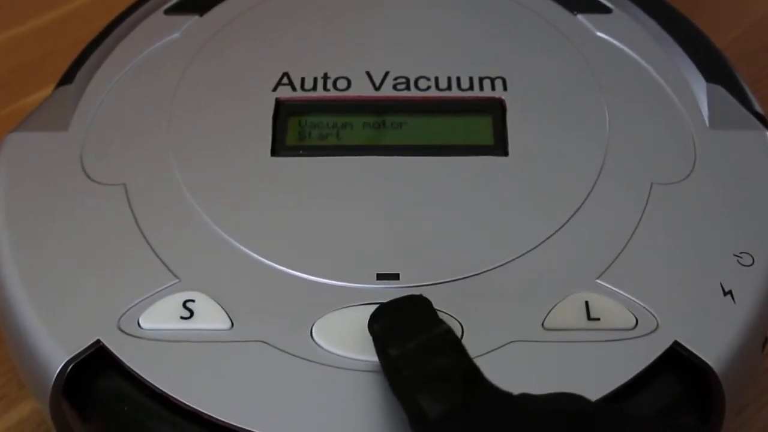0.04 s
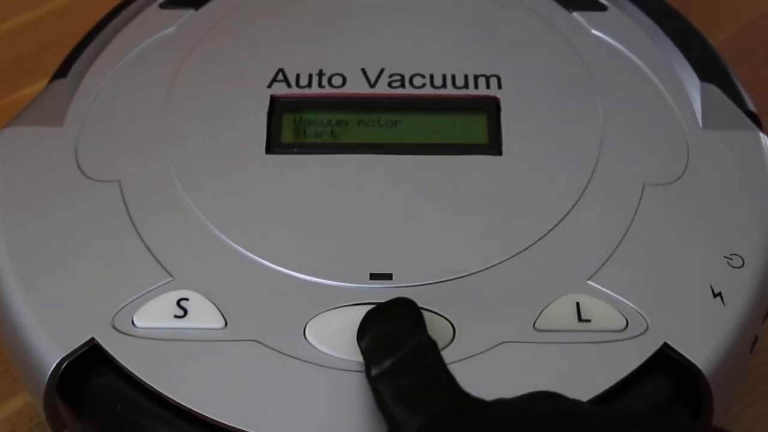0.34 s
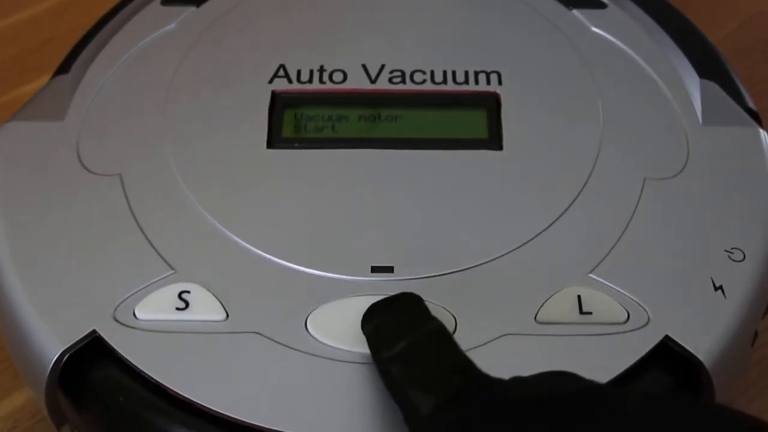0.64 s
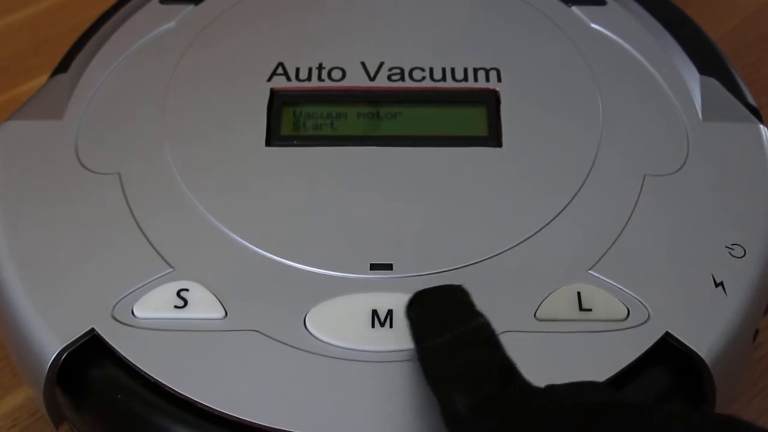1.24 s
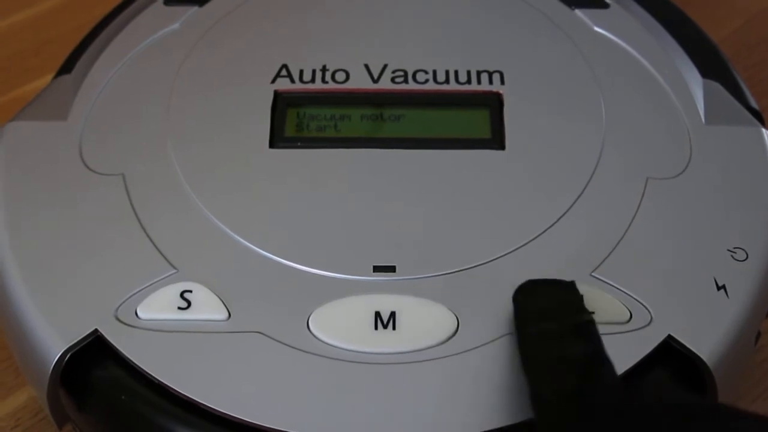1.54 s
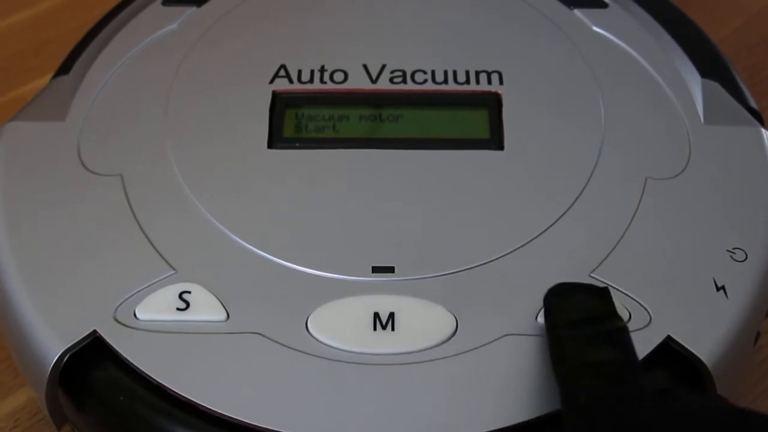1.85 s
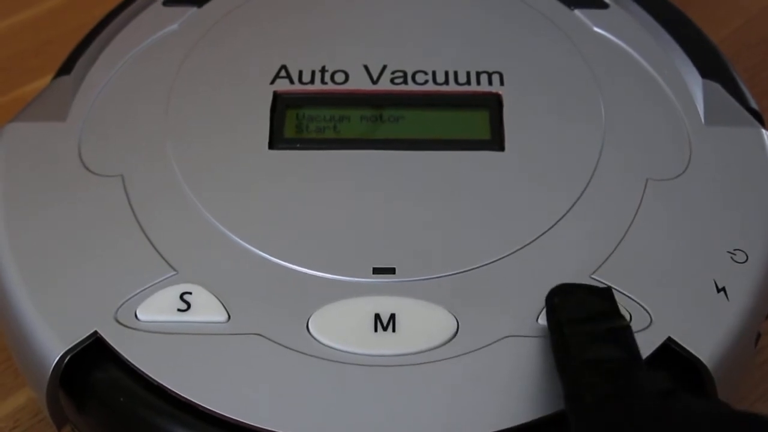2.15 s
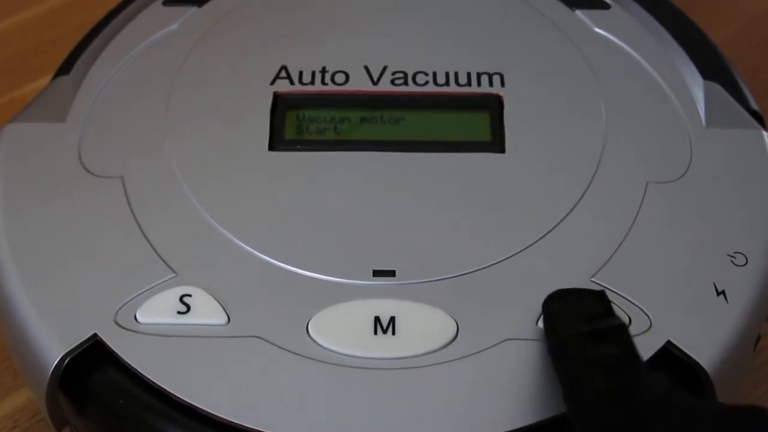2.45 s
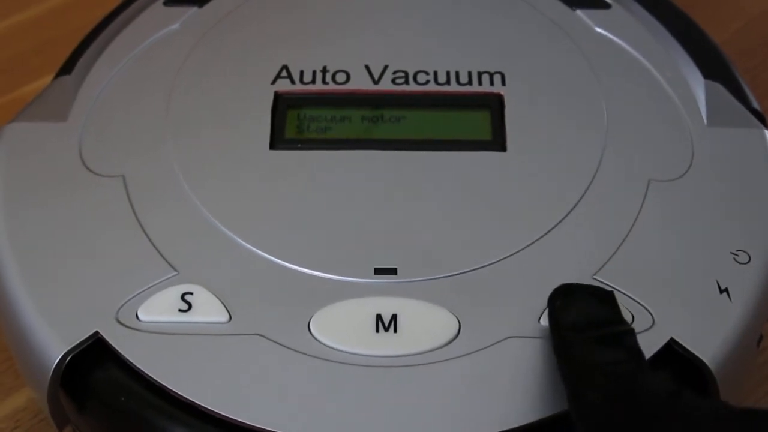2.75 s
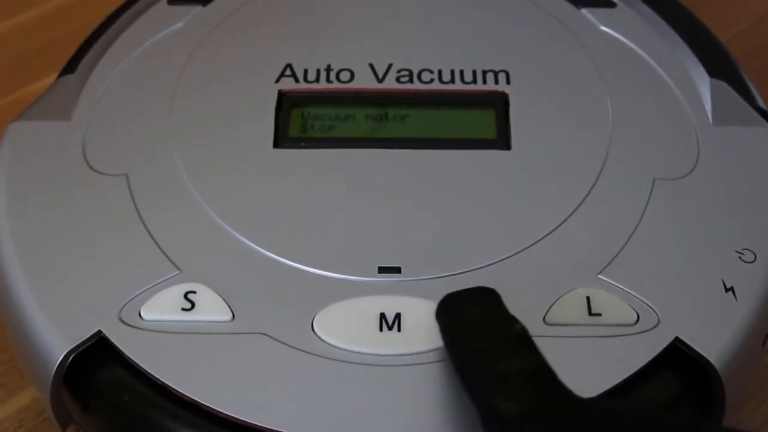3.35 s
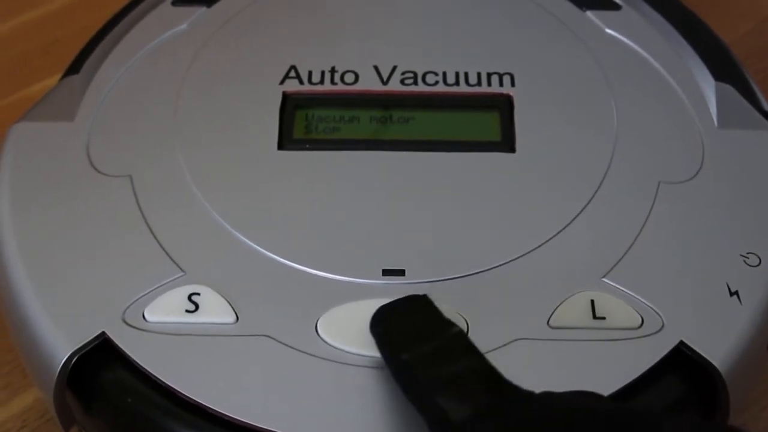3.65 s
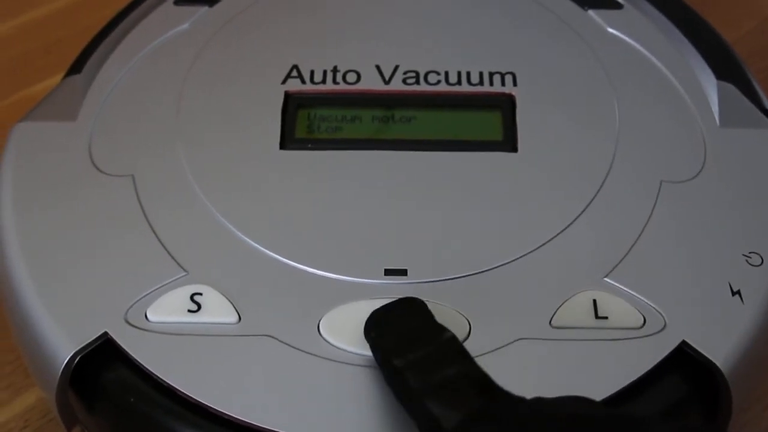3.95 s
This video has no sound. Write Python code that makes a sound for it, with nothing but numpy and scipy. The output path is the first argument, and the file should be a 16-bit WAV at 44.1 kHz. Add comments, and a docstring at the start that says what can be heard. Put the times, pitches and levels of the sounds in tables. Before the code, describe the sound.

A robot vacuum's small motor starts after a button click and whines steadily.

```python
"""Robot vacuum starting up

A quiet room, a stereo pair of microphones just above the lid. A finger clicks the plastic button;
the small suction motor kicks in with a rattle and spins up to a steady whine. Shaft harmonics sweep
through the housing's resonances, the brushes buzz and scrape once a turn, and air churns in the fan."""
import sys
import numpy as np
from scipy import signal
from scipy.fft import rfft, irfft
from scipy.io import wavfile

SR = 44100
rng = np.random.default_rng(int(sys.argv[2]) if len(sys.argv) > 2 else 0)


def int16_out(signal):
    """Quantize to a 16-bit WAV file."""
    q = np.round(np.clip(np.atleast_2d(signal).T, -1, 1) * 32767)
    wavfile.write(sys.argv[1], SR, q.astype(np.int16))


N = 176400


def undb(db):
    """Decibels to gain."""
    return np.exp(np.asarray(db) * np.log(10) / 20)


def curve(t, table, column=1):
    """One column of a table over time, joined by straight lines."""
    rows = np.array(table, float)
    return np.interp(t, rows[:, 0], rows[:, column])


def at_hz(hz, table, column=1):
    """One column of a spectrum, on a log-frequency axis."""
    rows = np.array(table, float)
    return np.interp(np.log(np.maximum(hz, 1)), np.log(rows[:, 0]), rows[:, column])


def wander(per_s):
    """A smooth glide through per_s random values a second, with a spread near 1."""
    points = rng.standard_normal(2048)
    grid = np.linspace(0, N, 4096)
    place = grid * per_s / SR
    i = place.astype(int)
    part = place - i
    ease = part * part * (3 - 2 * part)
    return np.interp(np.arange(N), grid, points[i] + np.diff(points)[i] * ease)


def stereo_tone(phase, db, pan_db, lead):
    """One harmonic at the two microphones: the left is pan_db louder and lead radians ahead."""
    peak = np.sqrt(2) * undb(db)
    return np.array([peak * undb(s * pan_db / 2) * np.cos(phase + s * lead / 2) for s in (1, -1)])


# Stereo width at the microphones. Each row: frequency in Hz, side against mid in dB.
STEREO_WIDTH = [(30, -2), (70, -6), (150, 10), (500, -5), (1100, -9.5), (2200, -5), (5000, -11),
                (9000, -2.5), (14000, -3)]

def noise(colour):
    """Stereo noise of rms 1, coloured by rows of frequency in Hz and relative density in dB."""
    hz = np.arange(N // 2 + 1) * SR / N
    mid, side = rfft(rng.standard_normal((2, N))) * undb(at_hz(hz, colour))
    side = side * undb(at_hz(hz, STEREO_WIDTH))
    out = irfft(np.array([mid + side, mid - side]), N)
    return out / out.std()


# The room around the vacuum. Each row: frequency in Hz, relative noise density in dB.
ROOM_COLOUR = [(20, -19), (45, -15), (65, -1), (80, -2.5), (98, 4.5), (120, -4.5), (200, -3.5), (350, -7),
               (480, -5.5), (700, -13), (1200, -16), (2800, -25.5), (7000, -29.5), (15000, -37)]

def room_tone():
    """The faint, steady rumble of a quiet room."""
    return undb(-42.5) * noise(ROOM_COLOUR)


# The shaking housing. Each row: frequency in Hz, relative noise density in dB.
RATTLE_COLOUR = [(100, -22), (300, -28), (450, -2), (750, -2), (1000, 0.5), (1400, -0.5), (1800, -0.5),
                 (2200, -9.5), (3000, -10.5), (4200, -13), (5200, -21), (7500, -24), (11000, -33.5),
                 (13500, -30), (15500, -47)]

def rattle(age, attack_s=0.043, fade_from_s=0.088, fade_s=0.23):
    """The starting torque shakes the housing; the chatter fades as the motor gets up to speed."""
    attack = np.minimum(age / attack_s, 1) ** 1.45
    fade = np.exp(-np.maximum(age - fade_from_s, 0) / fade_s)
    rough_db = 2.5 * wander(260)
    return attack * fade * undb(-22.5 + rough_db) * noise(RATTLE_COLOUR)


# Modes of the plastic lid. Each row: frequency in Hz, relative level in dB, seconds to fall 60 dB.
LID_MODES = [(175, -7, .2), (455, -2.5, 0.23), (580, -5, 0.1), (740, -6, .16), (950, -12, 0.073),
             (1160, -6, 0.064), (1647, -12, .12), (1710, -8, 0.061), (2390, -18, .1), (4480, -29, .08)]
# The button, close up. Each row: start in seconds, gain of knock and ring in dB, tick level in dB.
BUTTON_CLICKS = [(0.1165, -34, -40), (0.127, -38, -54), (0.1455, -36.5, -34), (0.183, -48, -60),
                 (0.2008, -30, -55), (0.298, -39.5, -53)]

def button(t, tick_decay_s=0.0057, knock_decay_s=0.022):
    """Each click is a sharp tick, a knock in the housing and a short ring of the lid."""
    tick_noise = noise([(300, 2), (2000, 2), (5000, -5.5), (15000, -13)])
    knock_noise = noise(RATTLE_COLOUR[:3] + [(1200, -8.5), (3000, -26), (15000, -47)])
    out = 0
    for start, body_db, tick_db in BUTTON_CLICKS:
        age = np.maximum(t - start, 0)
        ring = 0
        for hz, db, t60 in LID_MODES:
            decay = undb(-60 * age / t60)
            ring += undb(db) * rng.choice([-1, 1]) * np.sin(2 * np.pi * hz * age) * decay
        knock = undb(-4.5) * knock_noise * np.exp(-age / knock_decay_s)
        tick = undb(tick_db) * tick_noise * np.exp(-age / tick_decay_s)
        out += (t >= start) * (undb(body_db) * (0.5 * ring + knock) + tick)
    return out


# The rubbing brushes. Each row: frequency in Hz, relative noise density in dB.
SCRAPE_COLOUR = [(500, -2), (1200, 36), (2200, -21), (4200, 21), (5200, 3), (7300, 3), (10500, -15),
                 (13500, -6), (15500, -9)]

def brush_scrape(spin, angle, sharpness=1.3):
    """The brushes scrape once a turn, harder under the starting current."""
    contact = np.exp(sharpness * np.cos(angle))
    contact /= np.sqrt(np.mean(contact ** 2))
    load_db = 9 * np.sqrt(1 - spin)
    return spin * undb(-41 + load_db) * contact * noise(SCRAPE_COLOUR)


# Air in the fan. Each row: frequency in Hz, relative noise density in dB.
AIR_COLOUR = [(120, -26.5), (200, -14), (330, -14), (470, -4), (660, -5.5), (800, -5), (980, 1.5),
              (1250, -5.5), (1450, -8.5), (1800, -9.5), (2150, -17), (2650, -10), (3300, -19.5),
              (4300, -22.5), (5200, -22.5), (7500, -20.5), (9700, -27), (12000, -30), (13400, -22),
              (15500, -33)]

def fan_air(spin, angle, churn_below_hz=2190):
    """Air churns in the lower band and hisses above it, all pulsing with each turn of the fan."""
    flow = noise(AIR_COLOUR)
    hz = np.arange(N // 2 + 1) * SR / N
    low = irfft(rfft(flow) / (1 + (hz / churn_below_hz) ** 6), N)
    hiss = flow - low
    churn = low * undb(1.77 * wander(60))
    pulse = 1 + 0.32 * np.cos(angle)
    return spin ** 2 * undb(-30.5) * (churn + hiss) * pulse


def flare_db(spin):
    """Random rises and dips of a climbing harmonic, as from crossing many small resonances."""
    climbing = np.minimum(3 * np.sqrt(np.abs(1 - spin)), 1)
    return 7 * climbing * (np.tanh(wander(40)) - 0.3)


# Slow swells of the tones. Each row: time in seconds, then gain in dB for each of the
# SWELLING_ORDERS in turn, for harmonics 5-10 together, and for the brush buzz.
SWELL_GAINS = [(0.8, 3.5, -4, 3, 2.5, 8, 6, -8, 2, 1.5), (1.0, -3, 3.5, 2, -2.5, -3, 5, -2, 2, -1.5),
               (1.25, -1, 2, 2.5, -1.5, -6, 1, -12, 2.5, 0.5), (1.6, 0, 1, 1.5, -3, 1, -1, -2, 3, 0),
               (1.85, -0.5, 0.5, -4.5, 0.5, 3.5, 1, 0, 0.5, 0),
               (2.0, -3, 2.5, -2.5, 1, 5.5, -5, 0.5, -1.5, 0.5),
               (2.17, -1.5, -4, 2.5, 1, 4.5, -2, 1, -3, 0), (2.27, -1, -3, 0, 1.5, 6, -4, 4.5, -3, 0),
               (2.38, 2.5, -13, 4, 0, -1, 2, 2, -2, -1), (2.58, 2.5, -7.5, -1, 1, -10, 4, 3.5, -2, -0.5),
               (2.7, -1, -3, -1.5, -2, 5, 2, -3, -1.5, -1), (2.82, 0, 0.5, 0, 0.5, 3, 0, 2, -2.5, 0.5),
               (3.0, -0.5, 3.5, -8.5, 1, 4, -10, -2, 0, 0.5), (3.19, 0.5, 2.5, -3, 1, 6, -9, -5, 0.5, 0.5),
               (3.28, 0.5, 3, -5, 3.5, -1, -4, 1, -3, -0.5), (3.42, 0.5, 3, -1.5, 1, -16.5, -1, 0, 0, 4),
               (3.62, 0, 3, -6.5, 3, -5, 1, 0.5, -1, -1), (3.88, 0, 1, -6, 2, -17, 2, -1, -1, -1)]
SWELLING_ORDERS = (1, 2, 3, 11, 19, 23, 39)
# The brush buzz. Each row: frequency in Hz, base level of a harmonic in dB, left minus right in dB.
BUZZ_COLOUR = [(2360, -52.5, 3.5), (4730, -54.5, 5), (5130, -65, -18), (5700, -55.5, 3.5), (7000, -55, 4),
               (8300, -49, -9), (9350, -60.5, -1), (10100, -59, -4), (11800, -65, -2), (13400, -52, 2),
               (14000, -56.5, 7), (15500, -67, 3)]

def brush_buzz(t, speed, spin, angle, order_limit=86):
    """The brushes snap once a turn: a smeared pulse whose harmonics slide under a fixed colour."""
    out = 0
    settled = spin ** 10  # single harmonics stand out only at a steady speed
    for k in range(1, order_limit):
        if k in WHINE_ORDERS:
            continue
        scatter, smear, lead = rng.standard_normal(3)
        uneven_db = 2 * scatter + 3.5 * wander(2.37)
        db = at_hz(k * speed, BUZZ_COLOUR) + settled * uneven_db + flare_db(spin)
        phase = k * angle + 1.29 * smear + 0.61 * wander(2.48)
        pan_db = at_hz(k * speed[-1], BUZZ_COLOUR, column=2)
        spread = 0.84 * np.sqrt(2 * k / order_limit)  # the microphones differ more toward the treble
        out += stereo_tone(phase, db, pan_db, spread * lead)
    return out * undb(curve(t, SWELL_GAINS, column=-1)) * spin ** 2.5


# Resonances of the housing. Each row: centre in Hz, width in Hz, lift in dB.
HOUSING_RESONANCES = [(180.7, 16, 16), (372, 39, 11.5), (499, 140, 11.5), (955, 170, 8), (1495, 64, 11.5),
                      (1797, 110, 12.5), (2343, 73, 17), (3240, 180, 11), (4270, 180, 15), (7200, 400, -2)]

def housing_db(hz):
    """The lift that the housing's resonances give a tone."""
    return sum(db / (1 + (2 * (hz - centre) / width) ** 2) for centre, width, db in HOUSING_RESONANCES)


# The strong shaft harmonics, as multiples of the shaft speed.
WHINE_ORDERS = (1, 2, 3, 4, 5, 6, 7, 8, 9, 10, 11, 12, 13, 15, 17, 18, 19, 23, 25, 37, 39, 40, 46, 73, 76)
# Those harmonics from above the lid. Each row: base level at running speed in dB, left minus right in dB.
WHINE_LEVELS = [(-35.5, -1.5), (-39.5, -2.5), (-30.5, 0), (-42, -2), (-31.5, -4), (-38, 0), (-32, 4),
                (-46, -1), (-37, -4.5), (-37, 5), (-33.5, -0.5), (-56.5, -23), (-38, -1), (-45.5, 1),
                (-46, 0), (-46, -0.5), (-46.5, -4), (-39.5, -1), (-48, -2), (-47, -15), (-40, -2.5),
                (-44, -4), (-49.5, 12), (-51.5, 8), (-50.5, 8)]

def whine(t, speed, running, angle, whistle_above_hz=2500):
    """Strong shaft harmonics, each swelling as it passes a resonance of the housing."""
    out = 0
    spin = speed / running
    caught = 1 / (1 + ((1 - spin) / 0.05) ** 2)  # one half at 5 % off the running speed
    for k, (db, pan_db) in zip(WHINE_ORDERS, WHINE_LEVELS):
        hz = k * speed
        if k in SWELLING_ORDERS:
            db += curve(t, SWELL_GAINS, column=1 + SWELLING_ORDERS.index(k))
        elif 5 <= k <= 10:
            db += curve(t, SWELL_GAINS, column=-2)
        db -= housing_db(k * running)  # the base level includes the lift at running speed
        if hz[-1] > whistle_above_hz:  # high tones follow the buzz's colour until near full speed
            sweeping_db = at_hz(hz, BUZZ_COLOUR) + 1 + flare_db(spin)
            db = caught * db + (1 - caught) * sweeping_db
        waver_db = 0.82 * wander(2.37) + 0.93 * wander(35)
        db += housing_db(hz) + waver_db
        lead = 0.145 * pan_db * rng.choice([-1, 1])  # off-centre tones also differ in phase
        out += stereo_tone(k * angle + rng.uniform(0, 2 * np.pi), db, pan_db, lead)
    return out * spin ** 1.8 * undb(-0.5)


# The speed the shaft settles on. Each row: time in seconds, speed in turns per second.
RUNNING_SPEED = [(1.0, 182.0), (1.28, 181.4), (1.75, 181.9), (2.3, 182.3), (2.76, 183.0), (2.9, 182.3),
                 (3.2, 182.2), (3.32, 182.6), (4.0, 182.6)]

def motor(t, start_s=0.476, spin_up_s=0.108):
    """The shaft closes in exponentially on its running speed, driving the brushes and the fan."""
    age = np.maximum(t - start_s, 0)
    running = curve(t, RUNNING_SPEED)
    spin = 1 - np.exp(-age / spin_up_s)  # share of the running speed
    jitter = 0.00044 * wander(29.83)
    judder = 0.0198 * np.sqrt(1 - spin) * wander(120.7)  # only while accelerating
    speed = running * spin * (1 + jitter + judder)
    angle = 2 * np.pi * np.cumsum(speed) / SR
    tones = whine(t, speed, running, angle) + brush_buzz(t, speed, spin, angle)
    return tones + fan_air(spin, angle) + brush_scrape(spin, angle) + rattle(age)


def scene():
    """Button and motor close under the microphones, the room behind them."""
    t = np.arange(N) / SR
    return button(t) + motor(t) + room_tone()


def record(dry, top_hz=15650):
    """The recorder cuts the top with a steep low-pass."""
    return signal.sosfilt(signal.ellip(10, 0.2, 80, top_hz, fs=SR, output="sos"), dry)


dry = scene()
out = record(dry)
int16_out(out)
```